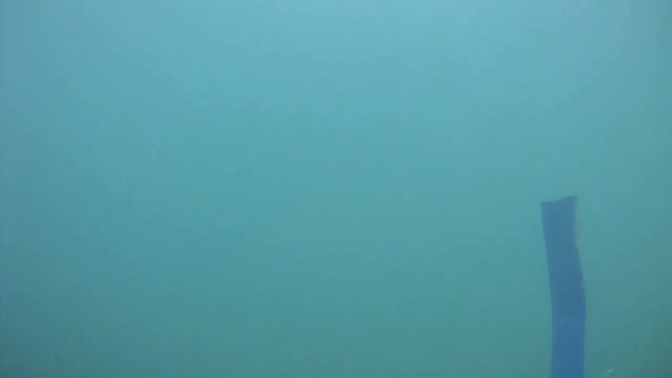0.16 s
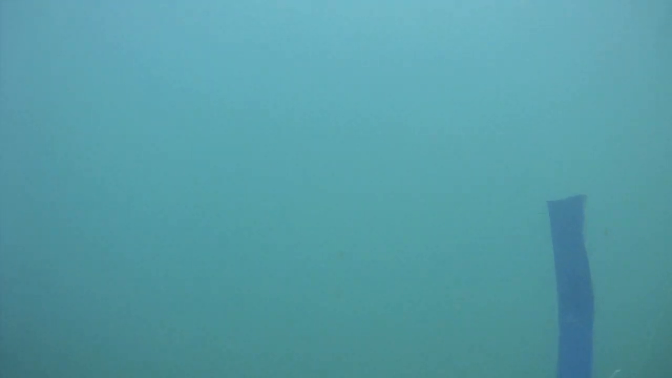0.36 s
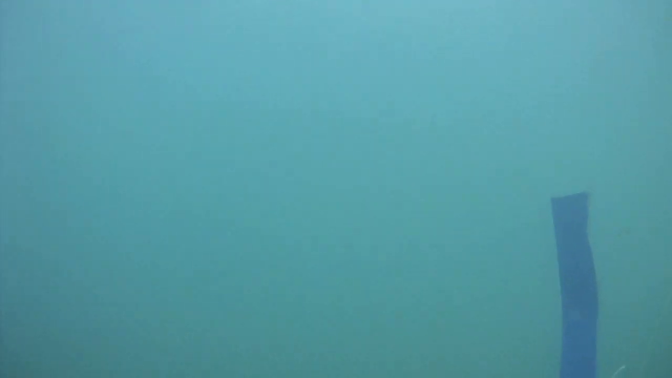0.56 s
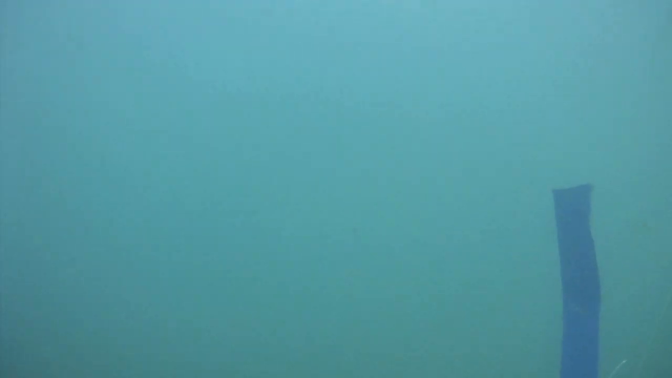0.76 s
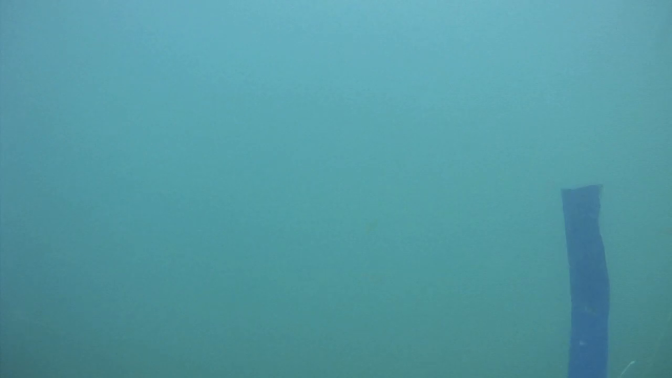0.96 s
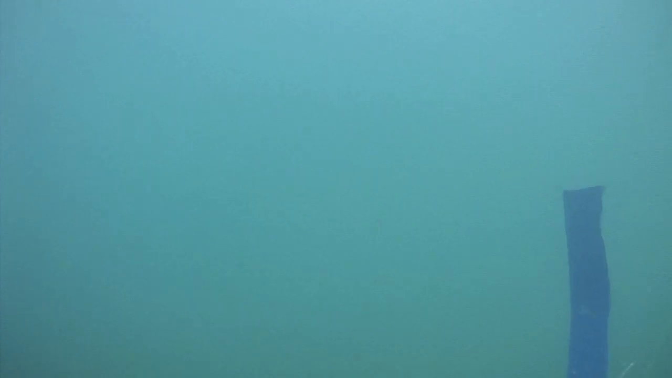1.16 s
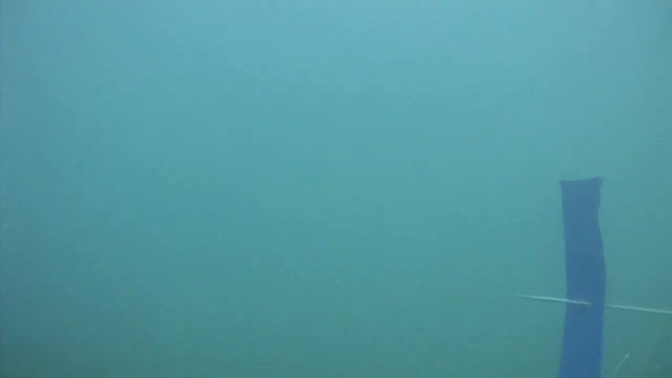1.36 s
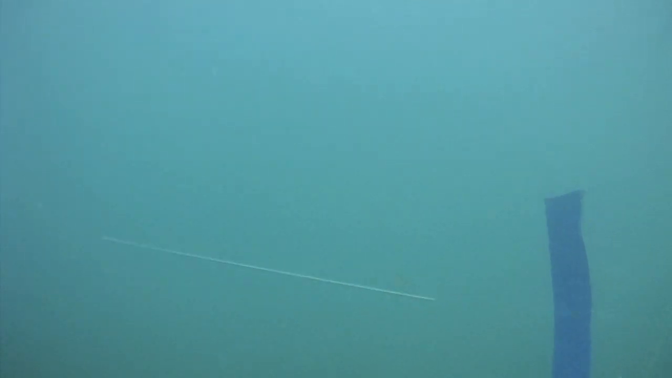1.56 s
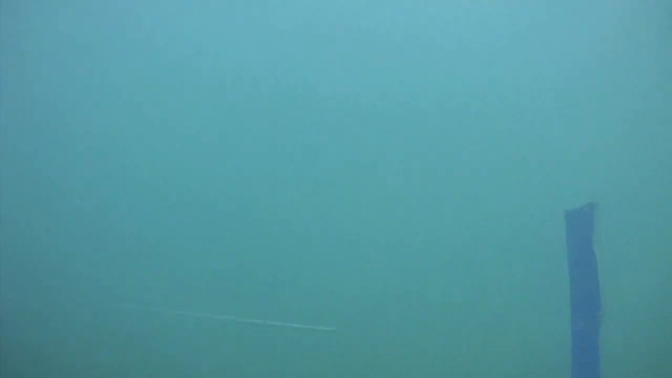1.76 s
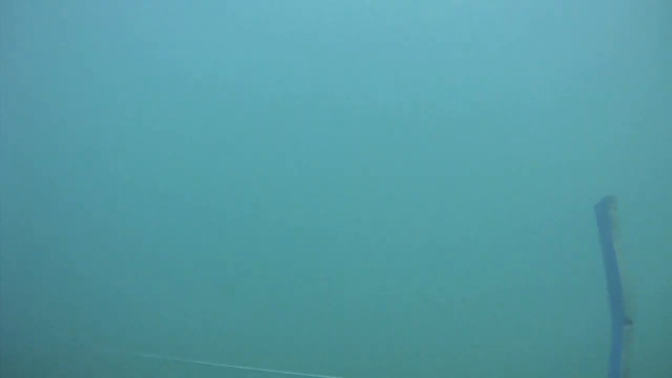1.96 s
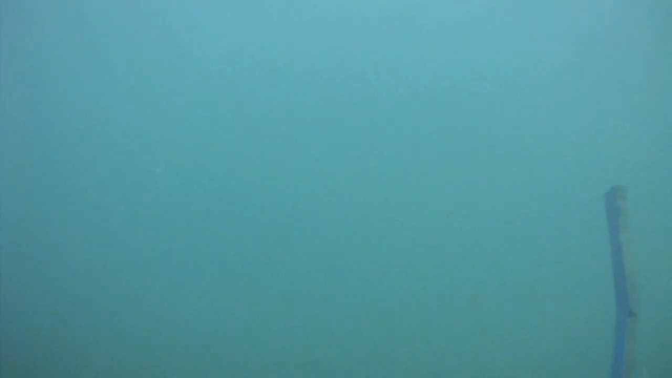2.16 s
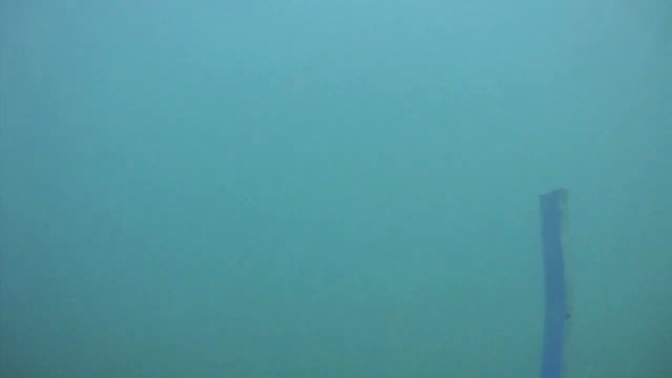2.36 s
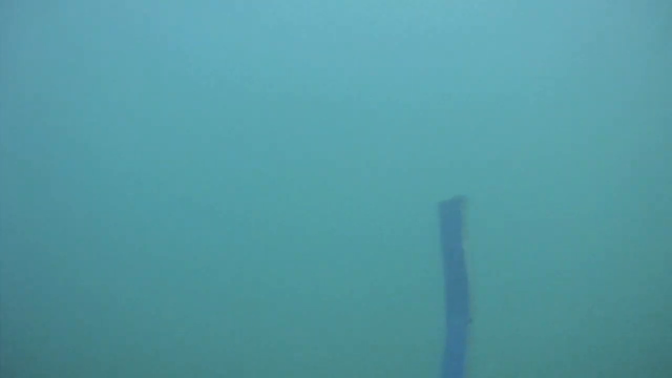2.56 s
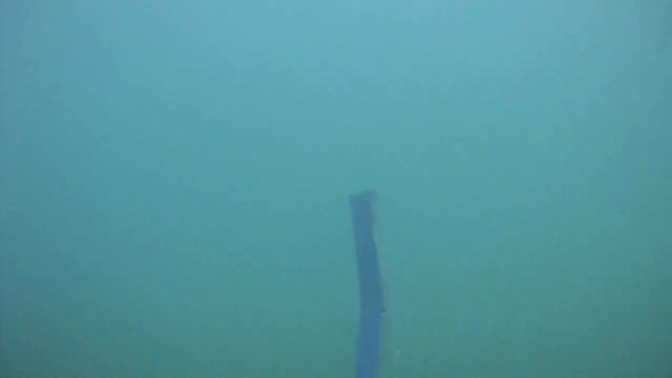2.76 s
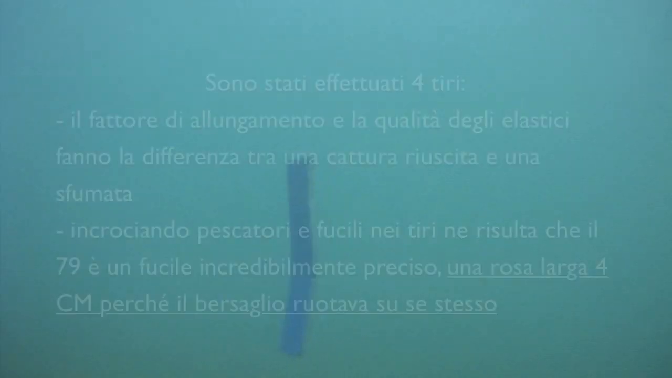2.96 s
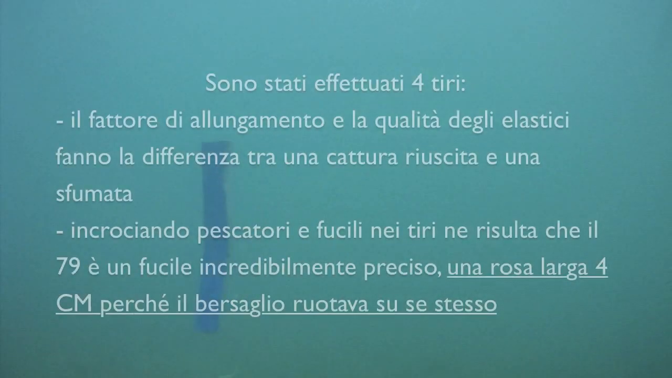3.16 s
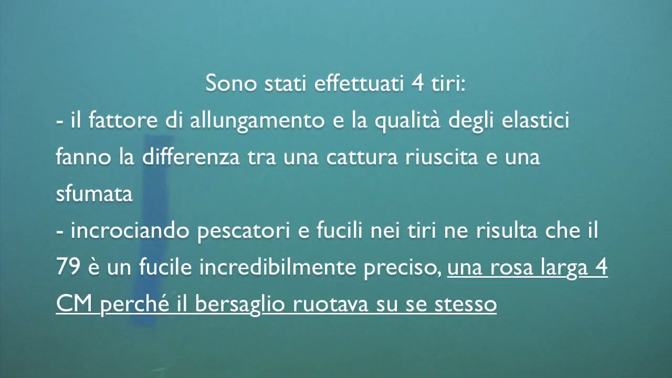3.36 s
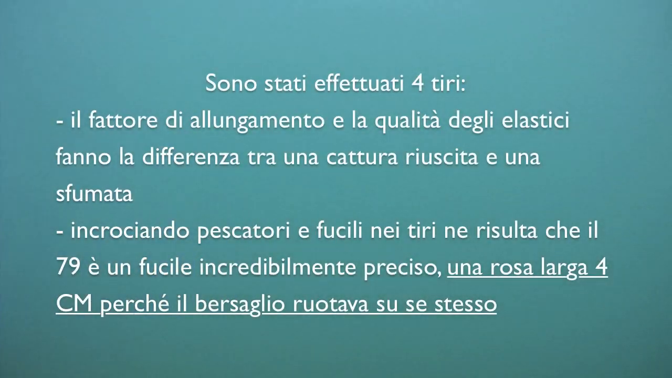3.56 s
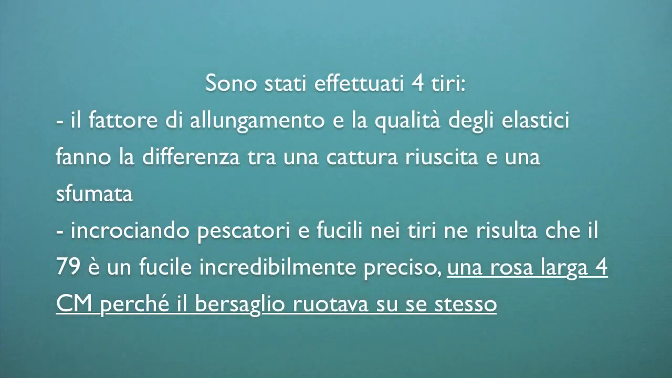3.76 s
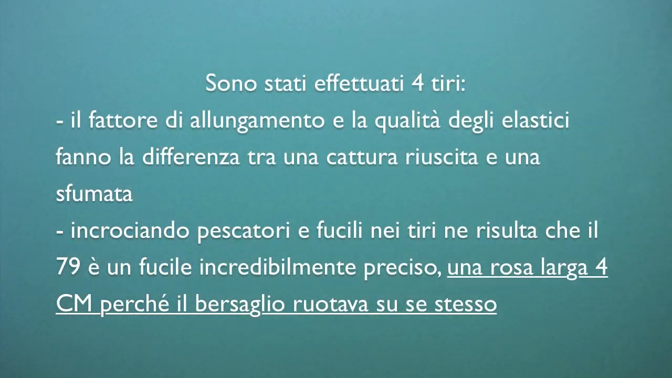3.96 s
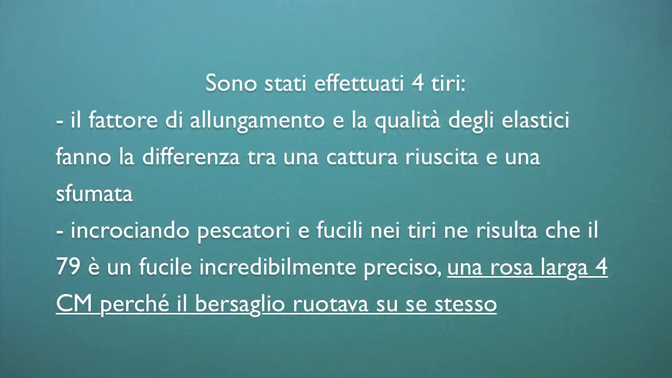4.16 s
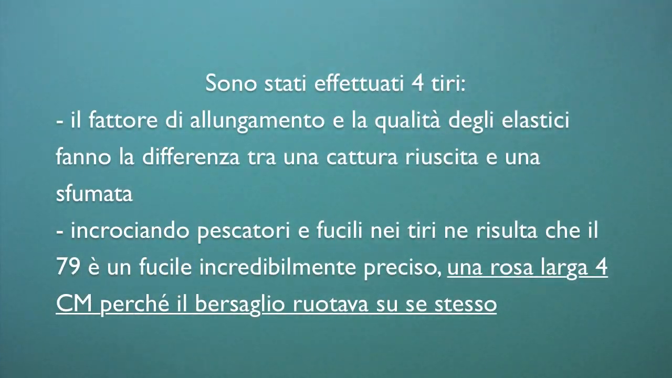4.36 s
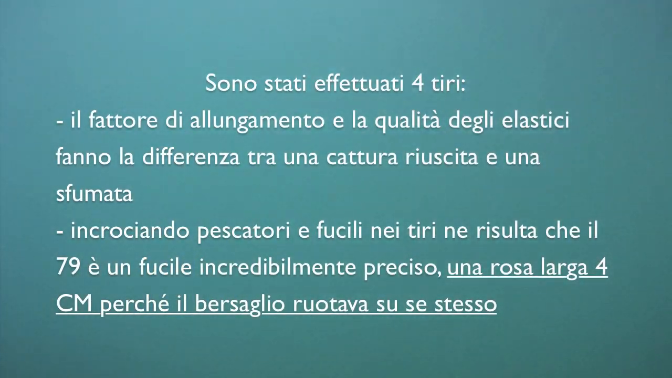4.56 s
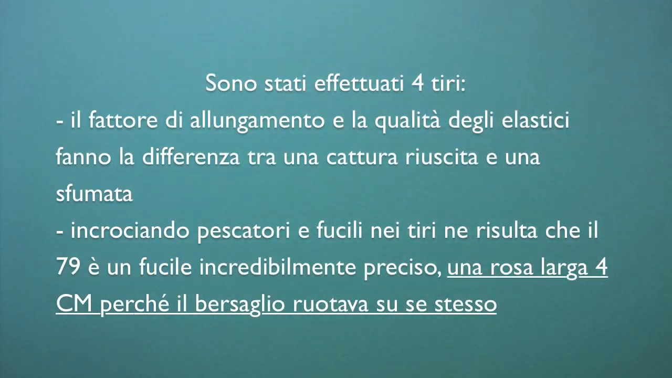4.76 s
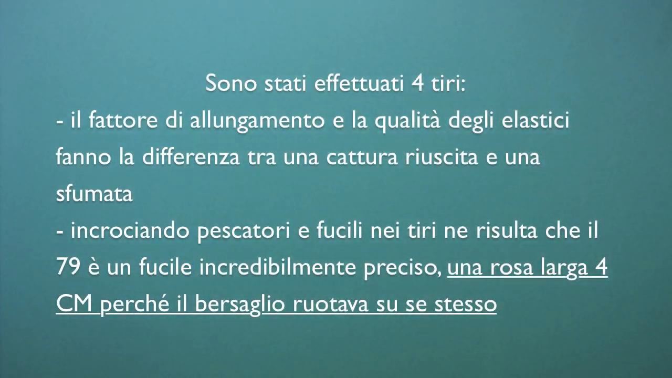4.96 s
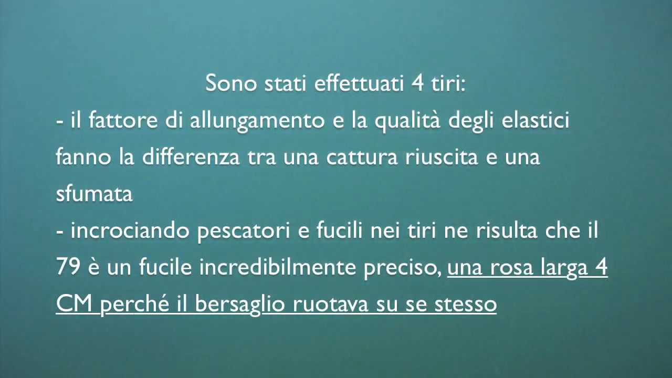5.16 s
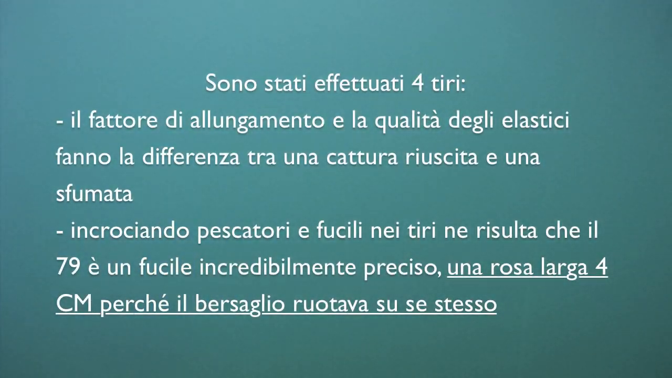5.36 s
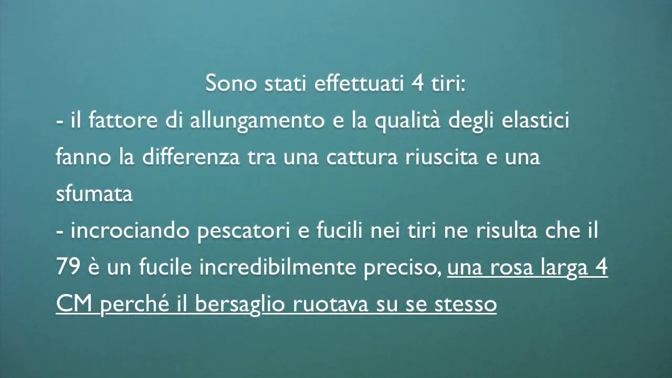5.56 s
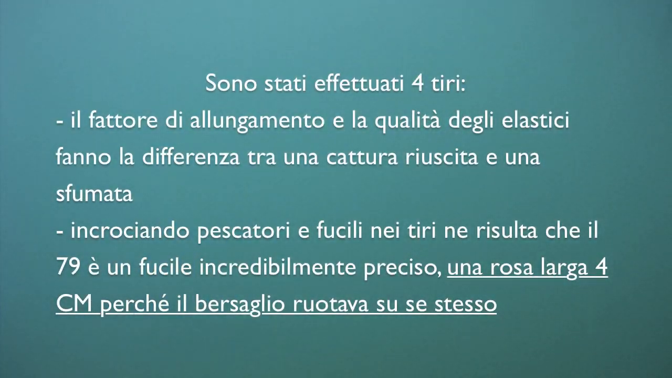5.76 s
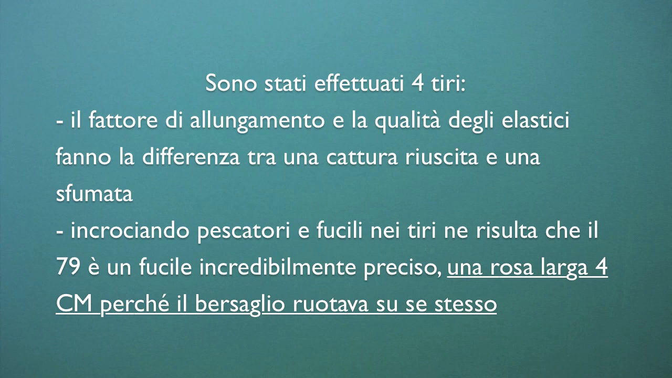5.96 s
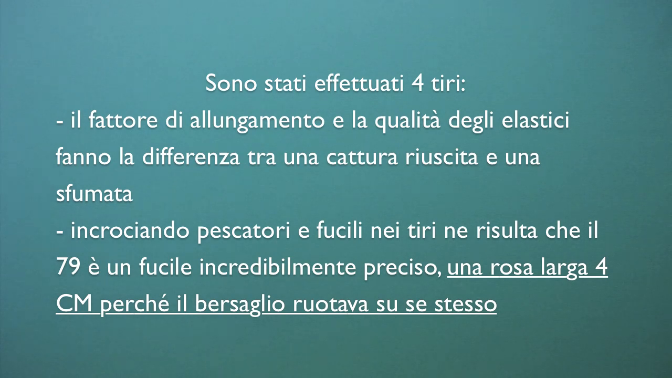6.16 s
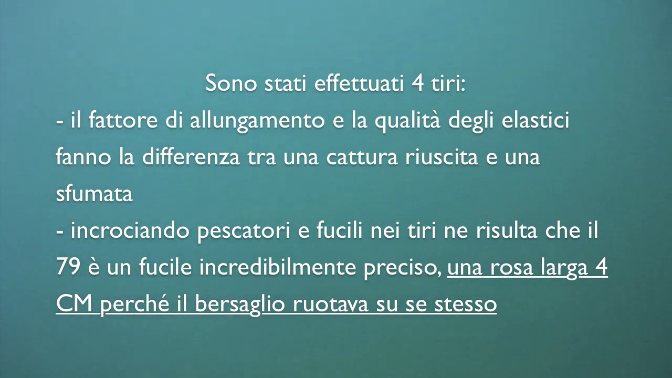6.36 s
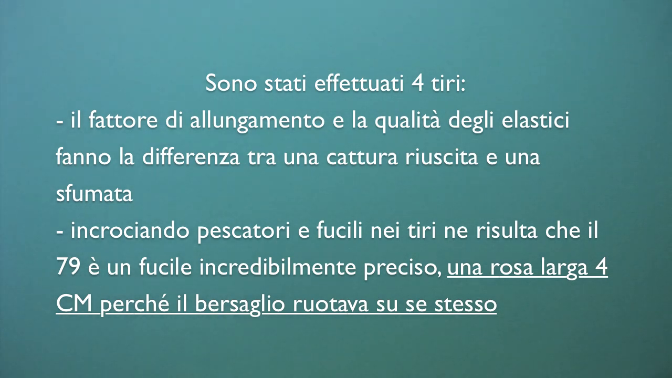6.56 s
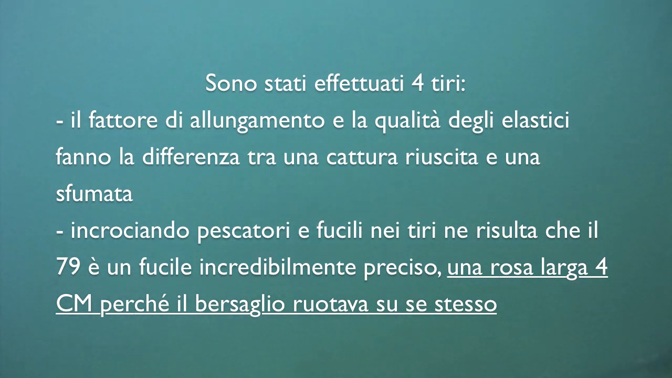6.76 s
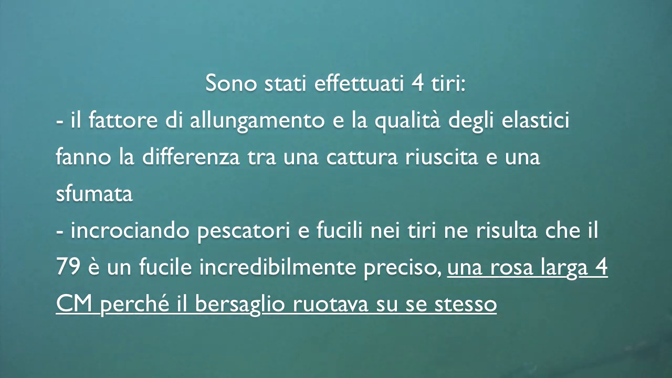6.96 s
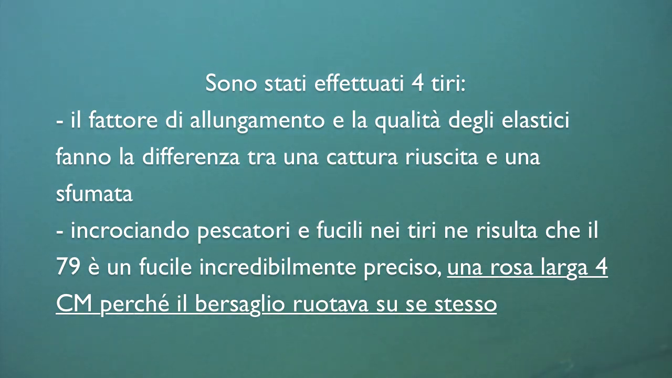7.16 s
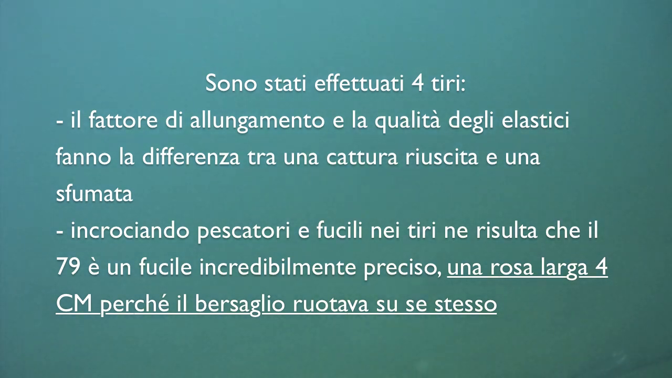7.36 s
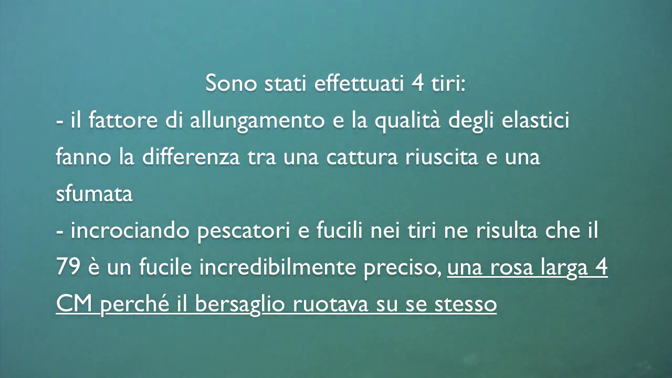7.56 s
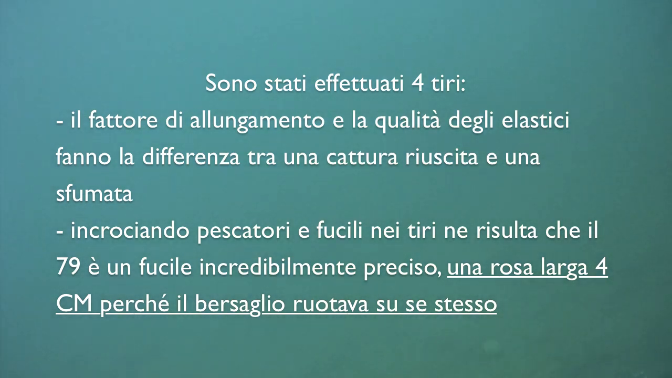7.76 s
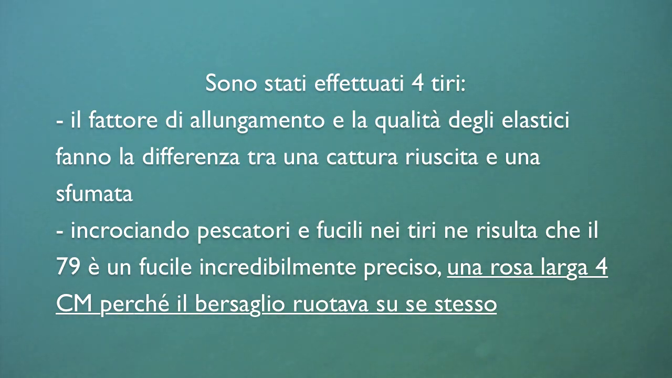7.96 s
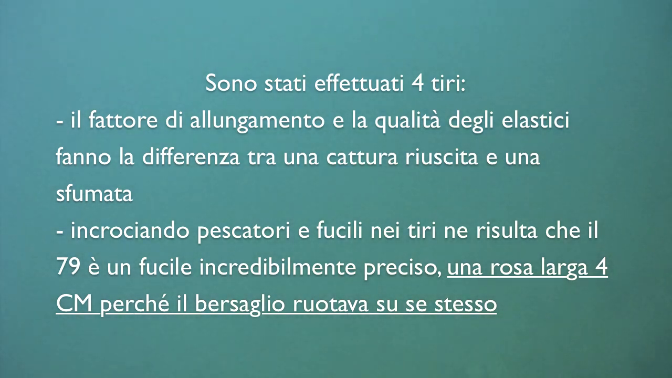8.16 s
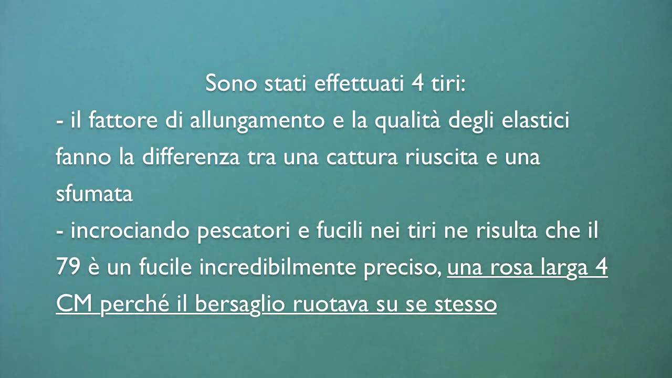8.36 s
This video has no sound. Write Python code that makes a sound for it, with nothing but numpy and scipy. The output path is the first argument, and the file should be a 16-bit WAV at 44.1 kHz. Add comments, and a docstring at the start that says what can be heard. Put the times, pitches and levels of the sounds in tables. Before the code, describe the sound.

A sharp steel clatter bursts from quiet underwater rumble, thuds and rings away briefly, leaving soft knocks, glugs, ticks and small ringing bubbles.

```python
"""A band-powered speargun fires under water, beside a camera in a waterproof housing.
Damped steel modes and contact noise clack as the spear scrapes out, over shoved water and a low shudder.
It stops with thuds and a ping, its line rasps as stick-slip noise, and the sea rings briefly in noise tails.
Then come faint clinks, knocks, low swelling gulps, a run of glugs, ticks, ringing bubbles and a late gurgle.
Rumble and hiss run throughout; the camera holds each sample, adding a thin fizz."""
import sys
import numpy as np
from scipy import signal
from scipy.fft import rfft, irfft
from scipy.io import wavfile
from scipy.ndimage import uniform_filter1d

SR = 44100
rng = np.random.default_rng(int(sys.argv[2]) if len(sys.argv) > 2 else 0)


def output_pcm(signal):
    """Save a mono or channel-first signal as 16-bit PCM at the path in sys.argv[1].

    Samples are clipped to [-1, 1] before scaling.
    """
    pcm = np.clip(np.atleast_2d(signal).T, -1, 1) * 32767
    wavfile.write(sys.argv[1], SR, np.round(pcm).astype(np.int16))


N = 374581
AGE_S = np.arange(SR // 2) / SR  # age of one event
CAMERA_HZ = 12000  # camera sample rate
GULP_CYCLES = 1.35  # from crest to fade
# snap of contact, relative spectrum: freq_hz, level_db
SNAP_COLOUR = [(200, -6.5), (1000, -6), (2100, 5), (2750, -9.5), (3650, 4.5), (4200, -21.5), (5500, -13.5)]


def gain_of(db):
    """Decibels to an amplitude factor."""
    return 10 ** (np.asarray(db) / 20)


def evened(x):
    """Scales to rms 1."""
    return x / np.sqrt(np.mean(x ** 2) + 1e-20)


def read(points, hz):
    """Interpolates a spectrum on a log-frequency axis."""
    f, value = np.transpose(points)
    return np.interp(np.log(hz + 1), np.log(f), value)


def level(curve):
    """A (s, dB) curve as a gain for every sample."""
    s, db = np.transpose(curve)
    return gain_of(np.interp(np.arange(N) / SR, s, db))


def envelope(start_s, attack_s, hold_s, release_t60_s, db):
    """Attack, hold and exponential release as a gain for every sample."""
    t = np.arange(N) / SR - start_s
    attack = np.clip(t / attack_s, 0, 1) ** 1.5
    released_s = np.maximum(t - attack_s - hold_s, 0)
    return attack * gain_of(db - 60 * released_s / release_t60_s)


def add(mix, s, sound):
    """Adds a sound into the mix at time s."""
    part = mix[max(round(s * SR), 0):][:len(sound)]
    part += sound[:len(part)]


def colour(x, spectrum):
    """Filters by a (Hz, dB) spectrum, closed above the camera's band."""
    hz = np.fft.rfftfreq(x.shape[-1], 1 / SR)
    gain = gain_of(read(spectrum, hz)) * (hz < CAMERA_HZ / 2)
    return irfft(rfft(x) * gain, x.shape[-1])


def noise(spectrum, size):
    """Coloured noise of rms 1."""
    return evened(colour(rng.standard_normal(size), spectrum))


def crack(spectrum, t60_s):
    """A short burst of contact noise, of the same energy for every draw."""
    fade = gain_of(-60 * AGE_S / t60_s) * (1 - np.exp(-AGE_S / 0.00062))
    burst = noise(spectrum, len(AGE_S)) * fade
    return evened(burst) * np.sqrt(np.mean(fade ** 2))


def ring(modes, pitch, length, rise_s):
    """Damped (Hz, dB, t60 s) modes, scaled in pitch and length, that swell during the contact time."""
    swell = 1 - np.exp(-(AGE_S / rise_s) ** 2)
    total = 0
    for hz, db, t60_s in modes:
        fade = gain_of(db - 60 * AGE_S / (t60_s * length))
        total = total + fade * np.sin(2 * np.pi * hz * pitch * AGE_S)
    return swell * total


def rub(stroke, spectrum, rough_db, size=80):
    """Friction: noise that catches and slips over about size samples."""
    wander = uniform_filter1d(rng.standard_normal(N), size=size)
    slips = gain_of(rough_db * evened(wander))
    return envelope(*stroke) * evened(noise(spectrum, N) * slips)


def gulp(s, db, hz, cycles):
    """A few low cycles that swell to a crest at time s and climb in pitch: (start s, sound)."""
    half_s = cycles / hz
    u = np.arange(-4 * half_s, 4 * half_s, 1 / SR)  # time from the crest
    turns = hz * (u + .04 * u ** 2 / half_s)
    return s + u[0], gain_of(db) * np.exp(-(u / half_s) ** 2) * np.sin(2 * np.pi * turns)


def sea_echo(x, low_t60_s, high_t60_s, wet_db):
    """Surface and seabed scatter sound into a short noise tail; low and bright parts decay separately."""
    # low part of the tail: freq_hz, level_db
    low_colour = [(80, 2.5), (170, 10), (400, 4.5), (700, -5), (1080, 1), (1600, -13.5), (2000, -21.5),
                  (4000, -25.5)]
    # bright part of the tail: freq_hz, level_db
    high_colour = [(900, -16.5), (1400, -9.5), (2000, -11), (2600, -2.5), (3600, 4.5), (5000, -1)]
    tail = np.zeros(len(AGE_S))
    for spectrum, t60_s in (low_colour, low_t60_s), (high_colour, high_t60_s):
        fade = gain_of(-60 * AGE_S / t60_s) * (1 - np.exp(-AGE_S / .008))
        tail += colour(rng.standard_normal(len(AGE_S)), spectrum) * fade / np.linalg.norm(fade)
    return gain_of(wet_db) * signal.fftconvolve(x, tail)[:N]


def clack(db, pitch, length, crack_db):
    """One blow of steel on the gun: its damped modes and a crack."""
    # modes of the loaded gun, before pitch and length factors: freq_hz, level_db, t60_s
    gun_modes = [(670, -31, 0.017), (1023, -21.5, .05), (1360, -7, 0.026), (1560, -20, 0.0093),
                 (1990, 5.5, .02), (2075, -13.5, .06), (3000, -18.5, .035), (3560, -23.5, 0.025),
                 (3900, -20.5, .025)]
    # crack of steel on the track, relative spectrum: freq_hz, level_db
    crack_colour = [(60, -11), (230, -6), (400, -17), (650, -5), (1300, 5), (2100, 3.5), (2400, -13),
                    (3000, -1), (4200, -3), (5500, -19)]
    modes = ring(gun_modes, pitch, length, rise_s=0.0011)
    return gain_of(db) * (modes + gain_of(crack_db) * crack(crack_colour, t60_s=0.015))


def sliding():
    """Friction of the spear, then of its line, sliding out."""
    # spear stroke: start_s, attack_s, hold_s, release_t60_s, level_db
    spear_stroke = (1.131, .013, .03, .11, -24.5)
    # line stroke: start_s, attack_s, hold_s, release_t60_s, level_db
    line_stroke = (1.577, .043, .029, .05, -43.8)
    # spear friction, relative spectrum: freq_hz, level_db
    spear_colour = [(100, -21.5), (400, -17.5), (600, -5.5), (1200, -2), (1600, -3), (2050, 3), (2350, -12),
                    (3000, -10), (3900, -10), (5500, -29)]
    # line friction, relative spectrum: freq_hz, level_db
    line_colour = [(300, -20), (700, -5), (1250, 0), (1600, -10), (1950, 3.5), (2700, -16), (3600, -16),
                   (5000, -41)]
    spear = rub(spear_stroke, spear_colour, rough_db=1.5)
    return spear + rub(line_stroke, line_colour, rough_db=3.5, size=200)


def shoves():
    """Low pulses of water shoved as the bands let go, as they slap home, and by the tugged gun."""
    # shoves: crest_s, level_db, pitch_hz at the crest, cycles from crest to fade
    shove_rows = [(1.135, -24, 170, .5), (1.175, -35, 200, 1.2), (1.492, -43, 170, 1.3)]
    out = np.zeros(N)
    for row in shove_rows:
        add(out, *gulp(*row))
    return out


def shot(rebounds=2):
    """The spear clacks and rebounds along the track and drags its line, while water is shoved."""
    # blows: start_s, level_db, pitch_factor, ring_length_factor,
    # crack_db and first_rebound_db (both relative to the blow)
    blows = [(1.139, -5, .96, .5, -13, -16), (1.1652, -5, 1.01, 1.4, -17, -21),
             (1.1709, -2.5, .96, .62, -5, -24), (1.2039, -10.5, .94, 1.05, -18, -12.5)]
    rebound_s, rebound_loss_db = .0118, 7  # spacing, and loss from each rebound to the next
    steel = sliding()
    for s, db, pitch, length, crack_db, rebound_db in blows:
        add(steel, s, clack(db, pitch, length, crack_db))
        for k in range(rebounds):
            weaker_db = db + rebound_db - k * rebound_loss_db
            add(steel, s + (k + 1) * rebound_s, clack(weaker_db, pitch=1, length=1.2, crack_db=-10))
    return steel + shoves() + sea_echo(steel, low_t60_s=.4, high_t60_s=.42, wet_db=-16.5)


def thuds():
    """The spear is stopped hard and tugs on the gun: body modes, a snap and a ping; the last tugs are drier."""
    # blows through gun and housing: start_s, level_db, pitch_factor,
    # crack_db (relative to the blow), echo_db (relative to the blow)
    blows = [(1.34, -16, 0.64, -13.5, 0), (1.3423, -6, 1.003, -17, 0), (1.349, -21, 1.42, -4, 1),
             (1.391, -32, .65, -16, 0), (1.4855, -32, 0.83, -6, -6), (1.4985, -32, 0.71, 4, -12)]
    # body modes, before pitch and length factors: freq_hz, level_db, t60_s
    body_modes = [(176, -17.5, 0.049), (560, -16, 0.0047), (693, 6.5, 0.012), (954, -10.5, 0.045)]
    out, carried = np.zeros((2, N))
    for s, db, pitch, crack_db, echo_db in blows:
        ping = ring([(3620, -1, 0.0133)], 1, 1, rise_s=.001)  # steel shaft
        snap = crack(SNAP_COLOUR, t60_s=0.025) + ping
        body = ring(body_modes, pitch, 0.95, rise_s=0.00097)
        blow = gain_of(db) * (body + gain_of(crack_db) * snap)
        add(out, s, blow)
        add(carried, s, gain_of(echo_db) * blow)
    return out + sea_echo(carried, low_t60_s=.41, high_t60_s=.5, wet_db=-15.5)


def shudder():
    """A low rough shudder during the shot, in opposite phase left and right."""
    # stroke: start_s, attack_s, hold_s, release_t60_s, level_db
    stroke = (1.14, .03, .06, .1, -44.5)
    spectrum = [(25, -0.5), (80, -10), (300, -27), (800, -37), (1200, -56.5)]  # Hz, dB
    return np.array([[1], [-1]]) * rub(stroke, spectrum, rough_db=3)


def clinks():
    """The hanging spear clinks: long steel modes and a snap."""
    # clinks: start_s, level_db, lean_db_per_octave (ring tilted toward upper modes)
    clink_rows = [(2.605, -50.5, -2), (2.683, -60, 8), (2.713, -54.5, 12), (2.821, -61, 14.5),
                  (6.07, -58, 4)]
    # spear modes, levels before the lean: freq_hz, level_db, t60_s
    spear_modes = [(2130, -5.5, 0.26), (3514, -5.5, 0.17), (2900, -11, 0.074)]
    pivot_hz = spear_modes[2][0]  # the lean turns about this mode
    out = np.zeros(N)
    for s, db, lean_db in clink_rows:
        modes = [(hz, mode_db + lean_db * np.log2(hz / pivot_hz), t60_s)
                 for hz, mode_db, t60_s in spear_modes]
        steel = ring(modes, 1, 1, rise_s=0.00042)
        add(out, s, gain_of(db) * (steel + gain_of(4) * crack(SNAP_COLOUR, t60_s=0.048)))
    return out


def knocks():
    """The housing is nudged: a soft noise burst over a damped low push."""
    # knocks: start_s, level_db, push_db (relative, before a 15.5 dB offset)
    knock_rows = [(3.576, -44.5, -1), (3.799, -45.5, 1.5), (3.8365, -41.5, 0.5), (7.509, -43, -17),
                  (8.152, -48, -9)]
    # knock noise, relative spectrum: freq_hz, level_db
    knock_colour = [(60, -17), (350, 2), (650, 5), (1050, 0), (1400, -7), (2000, -10), (4000, -23)]
    out = np.zeros(N)
    for s, db, push_db in knock_rows:
        push = gain_of(push_db + 15.5 - 60 * AGE_S / 0.022) * np.sin(2 * np.pi * 85 * AGE_S)
        add(out, s, gain_of(db) * (crack(knock_colour, t60_s=0.027) + push))
    return out


def ticks():
    """Small sharp ticks in the water: short noise bursts."""
    # ticks: start_s, level_db
    tick_rows = [(4.143, -52), (4.258, -51.5), (4.3419, -42.5), (4.9523, -45.5), (6.794, -49),
                 (7.4878, -47.5)]
    # tick noise, relative spectrum: freq_hz, level_db
    tick_colour = [(300, -6), (1800, -1), (4500, -4), (5500, -7)]
    out = np.zeros(N)
    for s, db in tick_rows:
        add(out, s, gain_of(db) * crack(tick_colour, t60_s=0.018))
    return out


def air_pockets(glugs=7, scatter_db=1.5, scatter_s=.002):
    """Big pockets of air gulp singly, once in a quick even run, and there is a late gurgle."""
    # single gulps: crest_s, level_db, pitch_hz at the crest
    gulp_rows = [(1.955, -47.5, 90), (3.16, -49, 138), (3.378, -34.5, 91.5), (4.492, -44, 145),
                 (5.234, -42.5, 104), (5.856, -47, 112), (8.484, -38, 131)]
    # gurgle round the housing: start_s, attack_s, hold_s, release_t60_s, level_db
    gurgle_stroke = (8.29, .04, .17, .1, -48.3)
    # gurgle noise, relative spectrum: freq_hz, level_db
    gurgle_colour = [(40, -8), (70, -12), (125, -1), (175, 0), (240, -20), (500, -40)]
    glug_start_s, glug_every_s, glug_db, glug_hz, glug_cycles = 3.947, .0672, -43.5, 152, 1.0
    out = rub(gurgle_stroke, gurgle_colour, rough_db=1.5, size=800)
    for row in gulp_rows:
        add(out, *gulp(*row, GULP_CYCLES))
    for k, (late, loud) in enumerate(rng.standard_normal((glugs, 2))):
        crest_s = glug_start_s + k * glug_every_s + scatter_s * late
        add(out, *gulp(crest_s, glug_db + scatter_db * loud, glug_hz, glug_cycles))
    return out


def bubble(db, hz, rise_s, pitch=1):
    """A ringing bubble; the bigger and lower it is, the longer it rings."""
    t60_at_1khz_s, size_law = .066, 1.3  # size_law: power of the bubble's size
    t60_s = t60_at_1khz_s * (1000 / hz) ** size_law
    return ring([(hz, db, t60_s)], pitch, 1, rise_s)


def bubbles(partner_db=-4):
    """Small bubbles ring in beating pairs that die away together."""
    # pairs: start_s, level_db, pitch_hz, partner_pitch_factor
    pairs = [(4.67, -47.5, 1150, 1.16), (4.736, -56, 1420, 1.12), (4.953, -55, 560, 1.09),
             (5.7955, -42.5, 1345, 1.29), (5.837, -48.5, 1900, .68), (6.3633, -49, 2010, 1.14),
             (6.44, -51, 1020, 1.4), (7.1604, -36.3, 531, 1.203), (7.281, -47.5, 670, .75),
             (7.908, -51, 1010, 1.3), (8.047, -53.5, 640, 1.14), (8.333, -37, 1830, 1.54)]
    out = np.zeros(N)
    for s, db, hz, partner in pairs:
        second = bubble(db + partner_db, hz, rise_s=.00013, pitch=partner)
        add(out, s, bubble(db, hz, rise_s=.00021) - second)
    return out


def stirred(start_s=2.6, bubbles_from_s=5.6, count=30, tick_db=-55.5, bubble_db=-52.5, gulp_db=-54.5,
            spread_db=7):
    """With the gun on the move, faint rustles and gulps come at random, and later stray bubbles."""
    rustle_colour = [(300, -3), (1000, -1), (2100, 1), (2800, -5), (3600, -1), (4500, -12)]  # Hz, dB
    out, end_s = np.zeros(N), N / SR
    for tick_at, bubble_at, gulp_at, size, far in rng.random((count, 5)):
        loss_db = spread_db * far
        rustle = crack(rustle_colour, t60_s=0.07)
        add(out, start_s + tick_at * (end_s - start_s), gain_of(tick_db - loss_db) * rustle)
        stray = bubble(bubble_db - loss_db, 950 * 3.4 ** size, rise_s=.0005)
        add(out, bubbles_from_s + bubble_at * (end_s - bubbles_from_s), stray)
        crest_s = start_s + gulp_at * (end_s - start_s)
        add(out, *gulp(crest_s, gulp_db - loss_db, 100 * 2 ** size, GULP_CYCLES))
    return out


def water(hiss_db=-64.0):
    """Swaying low rumble of water round the housing, under a smooth steady hiss."""
    # rumble level, before a 3.4 dB lift: time_s, level_db
    sway = [(0.0, -60), (0.71, -65), (1.37, -58), (1.58, -62), (2.32, -64), (2.55, -57), (3.19, -61),
            (4.3, -55), (4.94, -61), (6.98, -58), (8.09, -61), (8.49, -56)]
    # rumble, relative spectrum: freq_hz, level_db
    rumble_colour = [(12, -2), (30, 0.5), (60, -4.5), (120, -7.5), (200, -16.5), (300, -26.5), (600, -40)]
    # hiss of the sea, relative spectrum: freq_hz, level_db
    hiss_colour = [(30, 2.5), (250, 0), (450, -1.5), (700, -4), (1400, -8), (2200, -9.5), (3600, -13),
                   (5200, -15.5)]
    rumble = gain_of(3.4) * level(sway) * noise(rumble_colour, N)
    return rumble + gain_of(hiss_db) * noise(hiss_colour, N)


def scene():
    """All sources but the shudder are alike in both channels; each adds its own faint electronic hiss."""
    own_hiss = gain_of(-70.5) * rng.standard_normal((2, N))
    gun = shot() + thuds() + shudder()
    handling = clinks() + knocks() + ticks()
    air = air_pockets() + bubbles() + stirred()
    return gun + handling + air + water() + own_hiss


def record(dry):
    """The camera samples slowly and holds each value, mirroring sound into the treble; then a band limit."""
    input_hz, edge_hz = 5650, 15600  # low-pass cutoffs before and after the hold
    input_filter = signal.firwin(121, input_hz, fs=SR)[None]
    narrow = signal.oaconvolve(dry, input_filter, "same")
    sampled = signal.resample_poly(narrow, CAMERA_HZ, SR, axis=1)
    held = np.repeat(sampled, 4, axis=1)
    out = signal.resample_poly(held, SR, 4 * CAMERA_HZ, axis=1)[:, :N]
    edge_filter = signal.firwin(255, edge_hz, window=("kaiser", 9), fs=SR)[None]
    return signal.oaconvolve(out, edge_filter, "same")


dry = scene()
out = record(dry)
output_pcm(out)
```